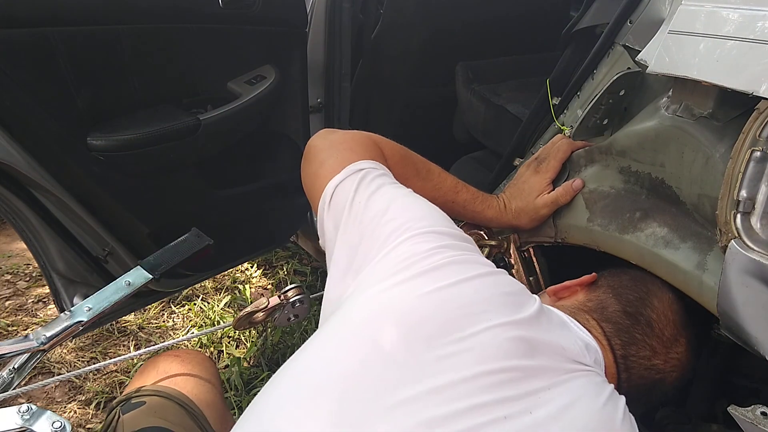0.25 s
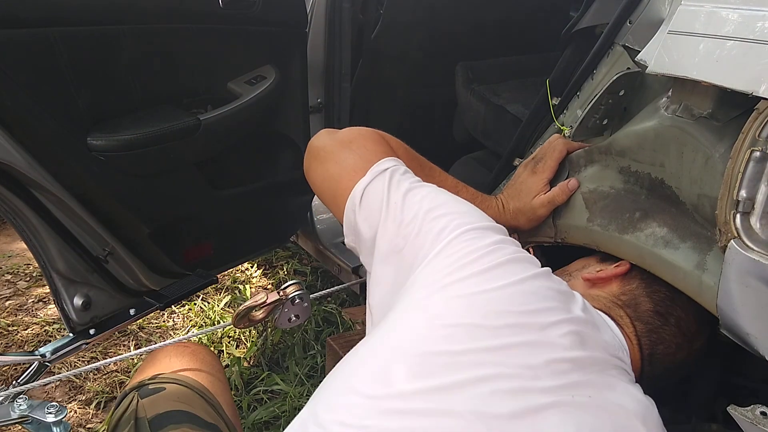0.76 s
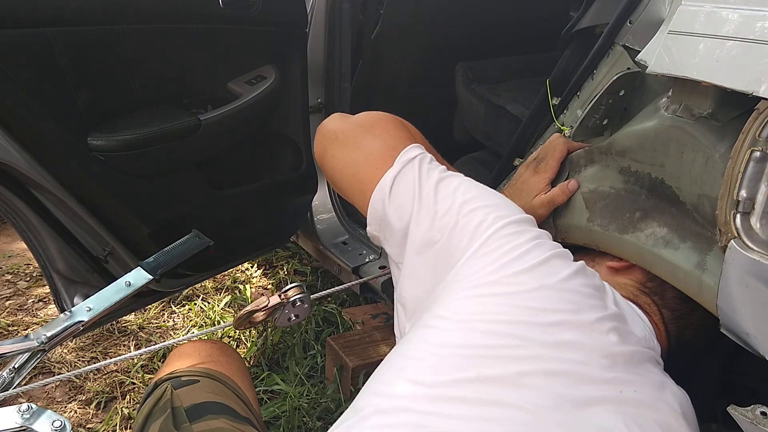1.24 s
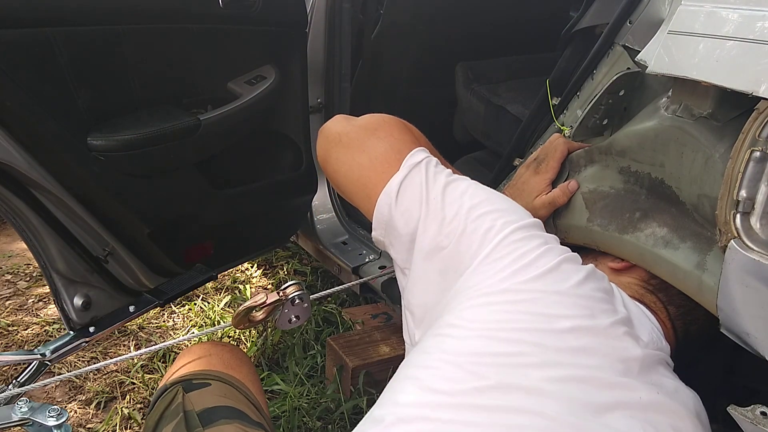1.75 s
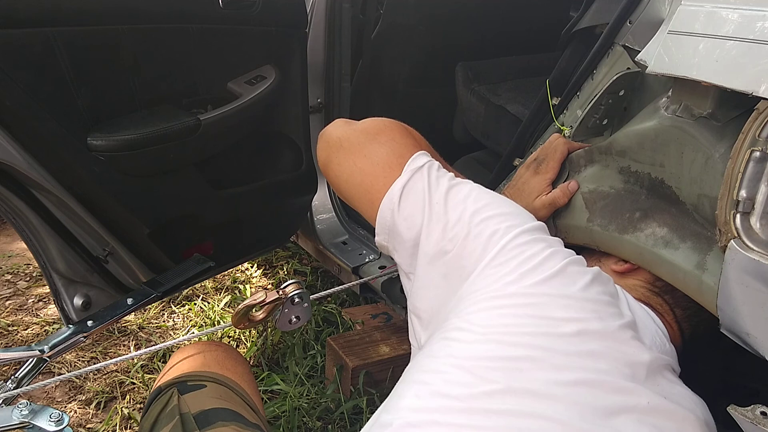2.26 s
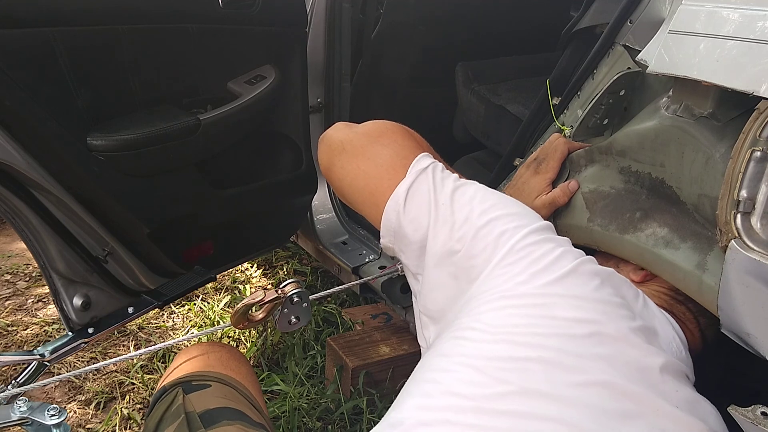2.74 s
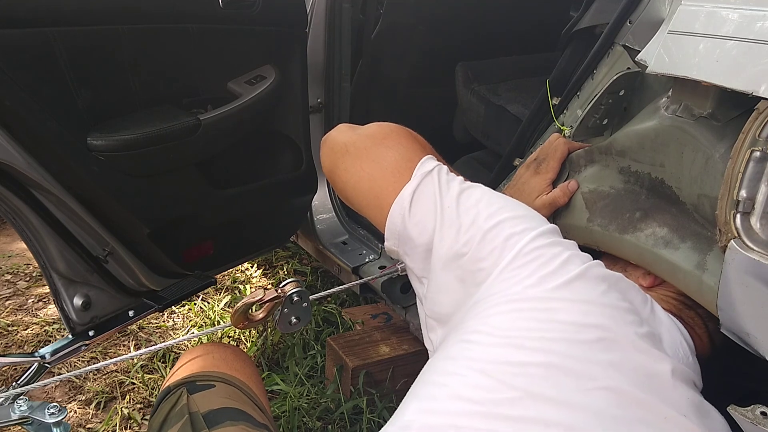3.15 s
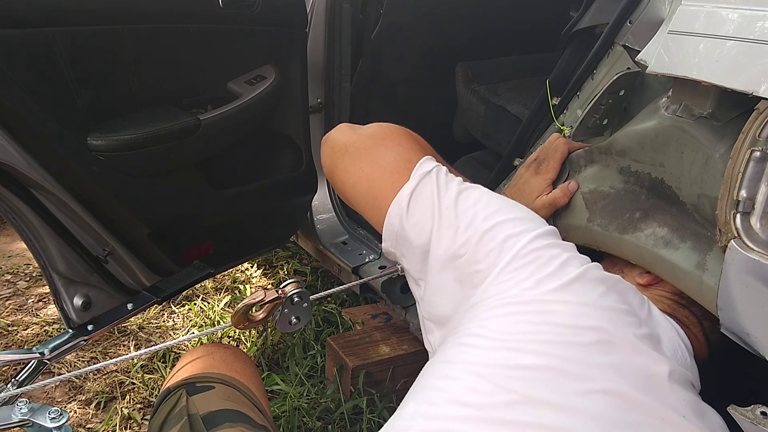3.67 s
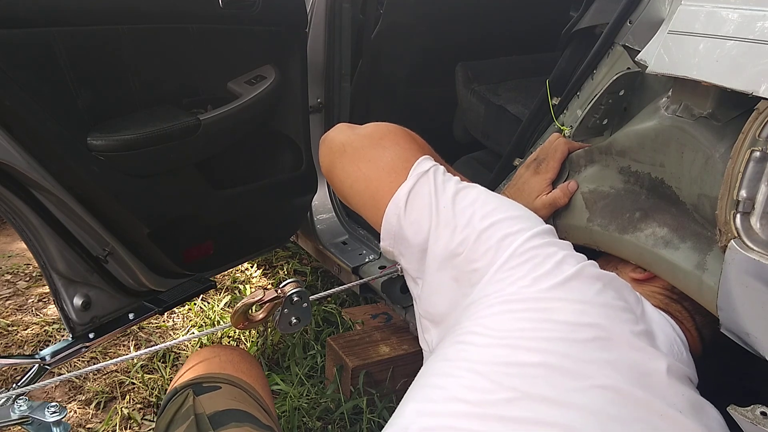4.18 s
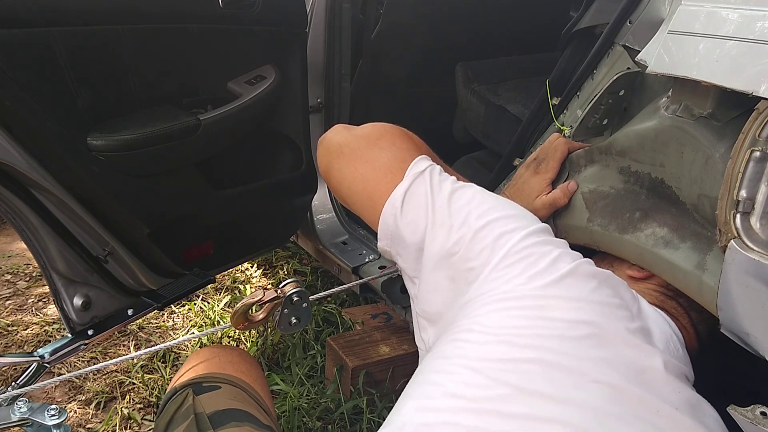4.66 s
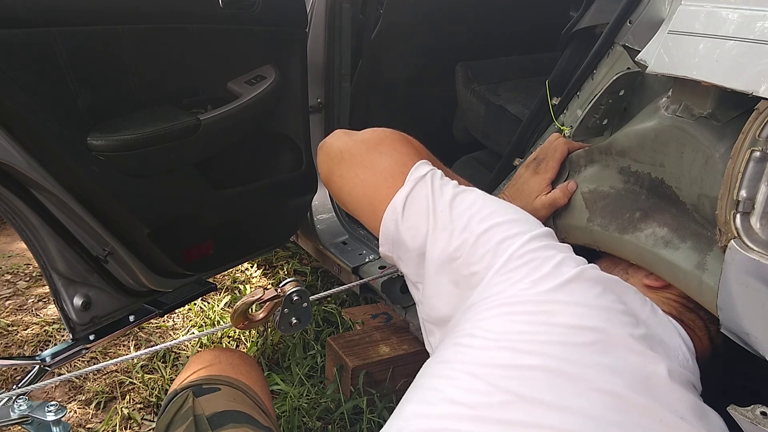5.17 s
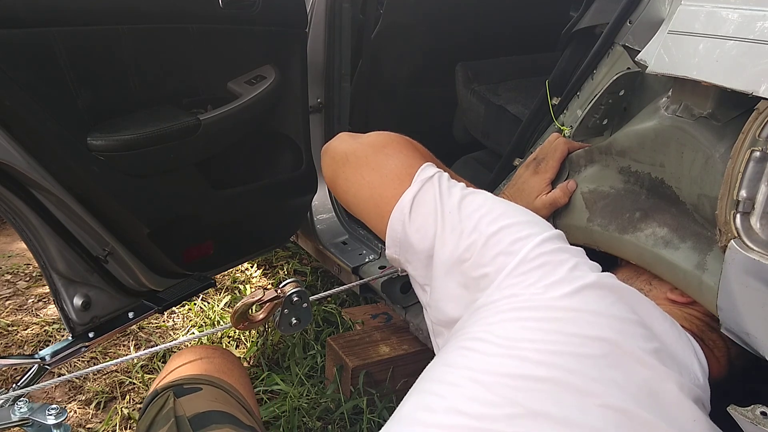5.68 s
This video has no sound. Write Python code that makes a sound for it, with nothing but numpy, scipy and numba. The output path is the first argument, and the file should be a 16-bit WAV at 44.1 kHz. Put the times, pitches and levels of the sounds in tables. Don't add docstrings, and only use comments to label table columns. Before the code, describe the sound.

Close hammering on damped sheet steel outdoors: one soft tap, then about a dozen hard clanging blows, roughly three a second, with a late gap.

```python
import sys
import numpy as np
from scipy import signal
from scipy.fft import rfft, irfft
from scipy.io import wavfile
from scipy.ndimage import uniform_filter1d
from numba import njit

SR = 44100
rng = np.random.default_rng(int(sys.argv[2]) if len(sys.argv) > 2 else 0)


def magnitude_from_level(level_db):
    exponent = np.asarray(level_db, float) / 20
    return 10 ** exponent


def dump_mix(stems):
    frames = np.atleast_2d(stems).T
    limited = np.clip(frames, -1, 1)
    pcm = np.round(limited * 32767).astype(np.int16)
    wavfile.write(sys.argv[1], SR, pcm)


N = 261072
RING = int(.45 * SR)

# (time [s], peak [dB], thud [dB], clang [dB], sizzle [dB])
BLOWS = [(1.28, -20.5, 3, -22, -26), (1.618, -2, -1.5, 5, 0.5), (2.007, -2, -4, 3.5, -0.5),
         (2.428, -2, -4.5, 2.5, 1), (2.87, -3, 5.5, -3, -2.5), (3.24, -6.5, 3, 2, 7.5),
         (3.516, -4.5, 5, 2.5, 5.5), (3.831, -3.5, -3.5, 2.5, 11.5), (4.124, -3.5, -5.5, 3, 7),
         (4.455, -2, -5, 0.5, -5), (4.764, -1.5, -8, 2, 8), (5.082, -0.5, -5, 2, 1.5),
         (5.6697, -1, 7, -12, -13)]
# (time [s], peak [dB], thud [dB], sizzle [dB])
BOUNCES = [
    (1.405, -59.5, -5.5, 0),
    (1.694, -13.5, -7, -38),
    (2.065, -8.5, -0.5, -1),
    (2.119, -21.5, 6, -48),
    (2.206, -41, 0, -3.5),
    (2.543, -14.5, -4.5, -16),
    (4.182, -13.5, -1, -15),
    (4.513, -13.5, 0, -3.5),
    (4.824, -10.5, 3.5, -7),
    (5.134, -12, 1, -4),
]
# (time [s], peak [dB])
TOUCHES = [
    (0.0, -47),
    (0.044, -61),
    (0.09, -57.5),
]
MOVES_S = [1.5, 2.7, 3.1, 3.4, 3.7, 4.3, 5.5]
# (boom [dB], body [dB], knock [dB], clank [dB])
SPOT_VOICES = [(3, 2.5, -1, -5), (1, 0, 0, 0.5), (-1, 1, -1.5, -9), (1, -1, -5, 4), (0.5, 0, -9, 4),
               (-1, -0.5, 2.5, 0.5), (-0.5, -0.5, 0.5, 0), (3, -2, -4.5, -13)]
COLOUR_HZ = [200, 420, 700, 1150, 1700, 2800, 9000]
# (frequency [Hz], level [dB], t60 [s])
PANEL_MODES = [(144, -9.5, 0.9), (218.4, 7.5, 0.35), (248.6, 7.5, 0.45), (298, -14, 0.14), (333, -2, 0.033),
               (380, -4.5, 0.099), (507, -5, 0.25), (514, -6, 0.045), (584.3, -3.5, 0.12), (696.8, 1, 0.12),
               (761, -4.5, 0.3), (858, -3, 0.13), (858.4, 2.5, 0.027), (977, -8.5, 0.018),
               (1097, -2.5, 0.12), (1380, -6, 0.11), (1405, -11.5, 0.028), (1570, -18.5, .08),
               (1704, -14, 0.23), (3030, -19.5, .06), (2990, -22, 0.18), (3700, -19.5, 0.18)]
# (frequency [Hz], level [dB], t60 [s])
SMALL_MODES = [(41, -44.5, 0.22), (115, -27, 0.21), (235, 2, 0.11), (540, -10, 0.1), (1070, -17, 0.097),
               (1510, -21, 0.078), (2370, -18, 0.06), (3340, -16, 0.026), (4680, -28.5, 0.043),
               (5820, -32, .05), (8100, -41.5, 0.033), (12000, -46, 0.031), (15950, -51, .02)]
# (frequency [Hz], level [dB], t60 [s])
SHELL_SHIVER = [(65, -51, 0.79), (140, -26.5, 0.75), (265, -26.5, 0.53), (500, -30, 0.44), (960, -32, 0.37),
                (2000, -38, 0.42), (3360, -37.5, 0.42), (5300, -44, 0.38), (8000, -57, 0.22),
                (12000, -50.5, 0.29), (14500, -55, 0.3), (16000, -58, .3)]
# (time [s], peak [dB])
CLINKS = [
    (0.0024, -65),
    (0.0444, -63),
    (0.0906, -60),
    (0.1096, -68),
]
# (frequency [Hz], level [dB], t60 [s])
TOOL_MODES = [(1500, 6, 0.37), (3200, 3, 0.13), (3400, 7.5, 0.21), (3870, 6, 0.088), (4800, 6, 0.088),
              (5800, 6, 0.13), (5700, -14.5, 0.092)]
# (time [s], frequency [Hz], level [dB], t60 [s])
KNEE_BUMP = (1.408, 125, -40, .13)
# (frequency [Hz], density [dB per Hz])
YARD_HUM = [(18, -51.5), (30, -34.5), (118, 3.5), (204, -6), (287, 1.5), (473, -29), (584, -21.5),
            (721, -23), (780, -18), (937, -25.5), (1720, -26.5), (1960, -29.5), (3200, -35.5),
            (16000, -53.5)]
# (frequency [Hz], level [dB], start [s], end [s])
WHINES = [
    (769, -82, -1, 7),
    (830, -86, -1, 7),
    (1325, -82, 5.43, 5.64),
    (1400, -69, 5.72, 5.9),
    (1400, -73, 3.57, 3.72),
]
# (frequency [Hz], level [dB])
PORT_BALANCE = [(120, -2.5), (300, -0.5), (700, -0.5), (1600, -1), (5000, 3), (9000, 3), (15000, 4.5)]


def hammer():
    hit = strikes()
    s, peak_db, clang_db = hit["s"], hit["peak"], hit["clang"]
    count = 1500
    small_hz = 40 + 16000 * rng.random(count) ** 1.5
    small_t60 = along(SMALL_MODES, small_hz, column=2) * np.exp(0.04 * rng.standard_normal(count))
    small_gain = magnitude_from_level(-14 + along(SMALL_MODES, small_hz)) * (small_hz / 1000) ** (1 / 6)
    big_hz, big_db, big_t60 = np.transpose(PANEL_MODES)
    big = len(big_hz)
    hz = np.r_[big_hz, small_hz]
    hand_t60_s = .16
    bank = rings(hz, np.r_[np.minimum(big_t60, hand_t60_s), small_t60], RING)

    same_spot, scatter_db, stray_db = 0.35, 2.0, 3.0
    spot = rng.standard_normal(count)
    chance = rng.standard_normal((len(s), 3, len(hz)))
    chance[:, 0, :big] = (-1.) ** np.arange(big) * magnitude_from_level(scatter_db * chance[:, 0, :big])
    chance[:, 0, big:] = np.sqrt(same_spot) * spot + np.sqrt(1 - same_spot) * chance[:, 0, big:]
    gain = magnitude_from_level(tint_db(hz)) * np.r_[magnitude_from_level(-13.5 + big_db), small_gain]

    t = np.arange(RING) / SR
    spread_s = .004 * magnitude_from_level(-0.19 * clang_db)[:, None]
    spread = 1 - 0.68 * np.exp(-(t / spread_s) ** 2)
    shape = magnitude_from_level(peak_db[:, None] - hit["damp"][:, None] * t) * spread
    direct, left, right = ((gain * chance[:, k]).astype(np.float32) @ bank * shape for k in range(3))

    contact_s = .0002 * magnitude_from_level(-.2 * clang_db)[:, None]
    x = (t - .001) / contact_s
    thump_db = 6 + hit["jump"] + peak_db + .8 * tint_db(1000)
    direct += magnitude_from_level(thump_db[:, None]) * -x * np.exp(.5 - x ** 2 / 2)
    return np.array([place(s, direct), magnitude_from_level(stray_db) * place(s, left), magnitude_from_level(stray_db) * place(s, right)])


def strikes():
    blows = np.array(BLOWS)
    s, peak, thud, sizzle = np.transpose(BOUNCES)
    parent = blows[np.searchsorted(blows[:, 0], s) - 1]
    touch_thud_db, touch_clang_db, touch_sizzle_db = 9, 12, 8
    blow_rows = np.c_[blows, blows[:, 2], 0 * blows[:, 0]]
    bounce_rows = np.c_[s, peak, thud, parent[:, 3] - 5.5, sizzle, parent[:, 2], 1 + 0 * s]
    touch_rows = [(*row, touch_thud_db, touch_clang_db, touch_sizzle_db, 0, 0) for row in TOUCHES]
    rows = np.r_[blow_rows, bounce_rows, touch_rows]
    s, peak, thud, clang, sizzle, backing, bounce = rows[np.argsort(rows[:, 0])].T
    touch = s < BLOWS[0][0]
    return dict(
        s=s, peak=peak, thud=thud, clang=clang, sizzle=sizzle,
        boom=np.minimum(-7 - 2.9 * peak, 3.5),
        knock=2.5 * bounce,
        jump=-5.5 + .2 * clang - 6 * bounce,
        shiver=1 - 3.25 * bounce + 8 * touch,
        damp=9.5 + 2.1 * backing - 0.21 * clang)


def tint_db(hz):
    hit = strikes()
    spot_boom, body, spot_knock, clank = np.array(SPOT_VOICES)[np.searchsorted(MOVES_S, hit["s"])].T
    marks = np.array([hit["boom"] + spot_boom, hit["thud"], body, hit["knock"] + spot_knock,
                      hit["knock"] + clank, hit["clang"], hit["sizzle"]])
    return np.array([np.interp(np.log(hz), np.log(COLOUR_HZ), mark) for mark in marks.T])


def rattle():
    hit = strikes()
    t, out = np.arange(RING) / SR, 0
    grain_db, grain = 1.1, walk(45)
    for hz, noise in bands(20, ripple_db=2.5):
        start_db = hit["peak"] + along(SHELL_SHIVER, hz) + 0.51 * tint_db(hz) + hit["shiver"]
        fall_db = (60 / along(SHELL_SHIVER, hz, column=2) + 2 * hit["damp"][:, None]) * t
        fall_db += 9 * (t / 0.3) ** 6
        rise = 1 - np.exp(-t / (0.0026 + 1.8 / hz))
        power = place(hit["s"], (magnitude_from_level(start_db[:, None] - fall_db) * rise) ** 2)
        out = out + np.sqrt(power) * magnitude_from_level(grain_db * (grain + walk(30))) * noise
    return out


def clinks():
    hz, db, t60 = np.transpose(TOOL_MODES)
    s, peak_db = np.transpose(CLINKS)
    scatter_db = 2.2 * rng.standard_normal((len(s), len(hz)))
    gain = magnitude_from_level(peak_db[:, None] - 15 + db + scatter_db)
    return place(s, gain @ rings(hz, t60, RING)) * magnitude_from_level(4.4 * walk(150))


def bump():
    s, hz, db, t60 = KNEE_BUMP
    modes = rings(hz * np.array([1, 1.5]), np.array([t60, t60]), RING)
    return place([s], magnitude_from_level(db) * modes.sum(axis=0, keepdims=True))


def yard():
    level_db, flicker_db = -59.5, -1.5
    swell, out = walk(0.25), 0
    for hz, noise in bands(34):
        band_db = along(YARD_HUM, hz) + .5 * swell + flicker_db * walk(8)
        out = out + magnitude_from_level(band_db) * np.sqrt(hz) * noise
    return out * magnitude_from_level(level_db) / out.std()


def whines():
    t, out = np.arange(N) / SR, 0
    for hz, db, start, end in WHINES:
        gate = np.clip(np.minimum(t - start, end - t) / .03, 0, 1)
        phase = 2 * np.pi * np.cumsum(hz * (1 + .0015 * walk(6))) / SR
        out = out + 2 * magnitude_from_level(db + 1.2 * walk(5)) * gate * np.sin(phase)
    return out


def wind():
    sos = signal.butter(2, [40, 300], "bandpass", fs=SR, output="sos")
    gust = signal.sosfilt(sos, rng.standard_normal((2, N))) * magnitude_from_level([2.0 * walk(5), 2.0 * walk(4)])
    return gust * magnitude_from_level([[-46], [-56]])


def along(table, hz, column=1):
    table = np.array(table)
    log_hz = np.log(np.maximum(table[:, 0], 1.))
    return np.interp(np.log(np.maximum(hz, 1.)), log_hz, table[:, column])


@njit
def rings(hz, t60, size):
    out = np.zeros((len(hz), size), np.float32)
    for k in range(len(hz)):
        z = 1 + 0j
        turn = np.exp(2j * np.pi * hz[k] / SR - np.log(1000) / (t60[k] * SR))
        for i in range(size):
            out[k, i] = z.imag
            if abs(z.real) + abs(z.imag) < 1e-6:
                break
            z *= turn
    return out


def place(times, sounds):
    out = np.zeros(N + RING)
    for s, sound in zip(times, sounds):
        out[int(s * SR):int(s * SR) + RING] += sound
    return out[:N]


def walk(rate_hz):
    k = int(SR / rate_hz)
    held = np.repeat(rng.standard_normal(N // k + 1), k)
    return 2.1 * uniform_filter1d(uniform_filter1d(held, k), k)[:N]


def bands(low_hz, ripple_db=0):
    hz = np.maximum(np.fft.rfftfreq(N, 1 / SR), 1.)
    knots_hz = np.arange(0, SR / 2, 35)
    ripple = np.interp(hz, knots_hz, rng.standard_normal(len(knots_hz)))
    noise = rfft(rng.standard_normal((3, N))) * magnitude_from_level(ripple_db * np.minimum(hz / 1500, 1) * ripple)
    for centre_hz in low_hz * 2 ** np.arange(0, np.log2(18000 / low_hz), .5):
        band = irfft(noise * np.clip(1 - 2 * np.abs(np.log2(hz / centre_hz)), 0, 1), N)
        yield centre_hz, band / band.std()


def steep(x, hz):
    return signal.sosfilt(signal.ellip(6, .5, 50, hz, fs=SR, output="sos"), x)


def ports(direct, left, right):
    spread_hz, capsule_lag_s, capsule_db = 1700, .0001, -2.13
    beam_s, beam_share, beam_fade_hz, shelf_hz = 0.0004463, 0.73, 11100, 378
    hz = np.fft.rfftfreq(N, 1 / SR)
    apart = 1j * hz / (spread_hz + 1j * hz)
    lag = magnitude_from_level(capsule_db) * np.exp(2j * np.pi * hz * capsule_lag_s)
    a = rfft(direct) + apart * rfft(left)
    b = rfft(direct) * lag + apart * rfft(right)
    late = beam_share / (1 + (hz / beam_fade_hz) ** 2) * np.exp(-2j * np.pi * hz * beam_s)
    shelf = (shelf_hz + 1j * hz) / (60 + 1j * hz) / 2
    tilt = magnitude_from_level(along(PORT_BALANCE, hz) / 2)
    return irfft(shelf * np.array([(a - late * b) * tilt, (b - late * a) / tilt]), N)


def scene():
    field = hammer()
    field += rattle() * magnitude_from_level([[0], [.5], [.5]])
    field += yard() * magnitude_from_level([[0], [3.0], [3.0]])
    field[0] += whines() + clinks() + bump()
    return ports(*field) + wind()


def band_limit(x):
    return signal.sosfilt(signal.butter(12, 16530, fs=SR, output="sos"), x)


def record(dry):
    hiss_db, top_hz, hiss_top_hz, rumble_hz = -92, 15100, 15800, 68
    x = steep(dry, top_hz) + magnitude_from_level(hiss_db) * steep(rng.standard_normal(dry.shape), hiss_top_hz)
    x = signal.sosfilt(signal.butter(2, rumble_hz, "highpass", fs=SR, output="sos"), x)
    x = np.clip(2.09 * np.tanh(x / 1.676), -1, 1)
    return band_limit(steep(x, 16000))


dry = scene()
out = record(dry)
dump_mix(out)
```